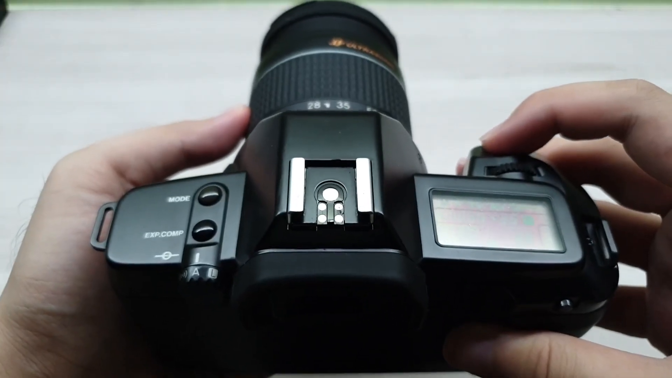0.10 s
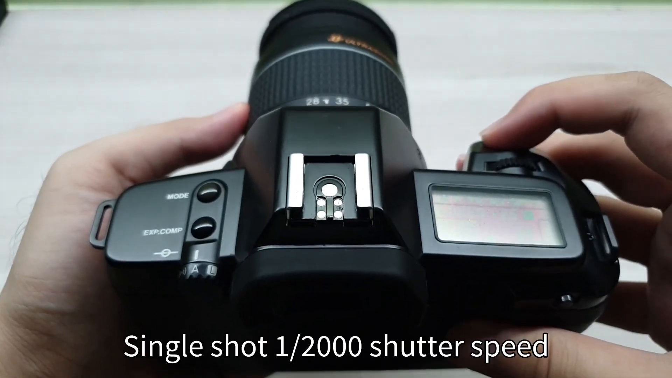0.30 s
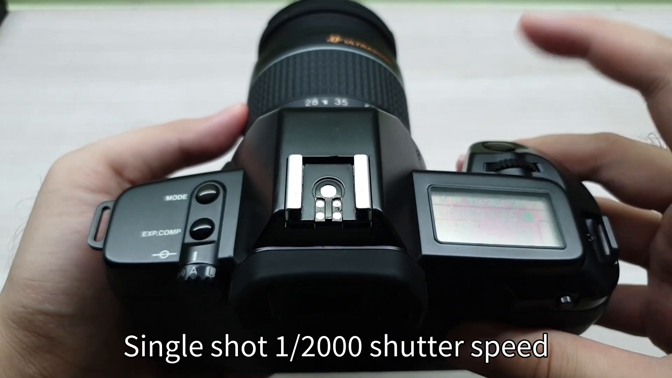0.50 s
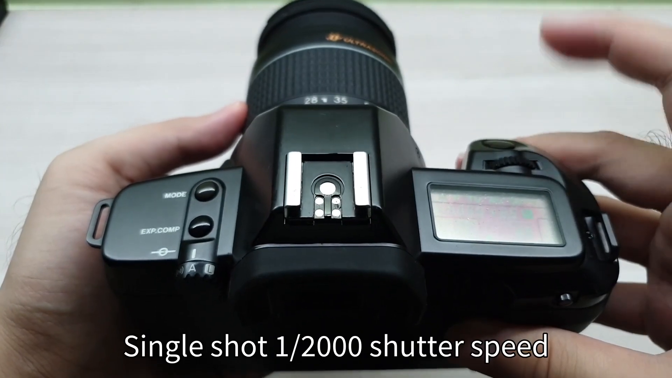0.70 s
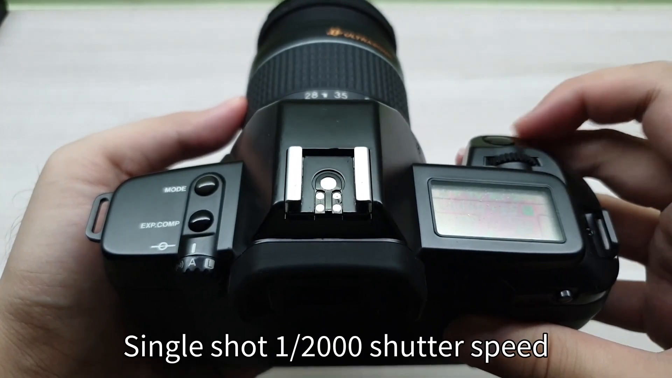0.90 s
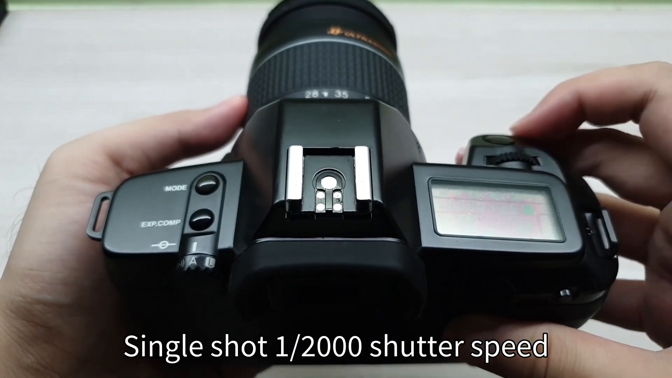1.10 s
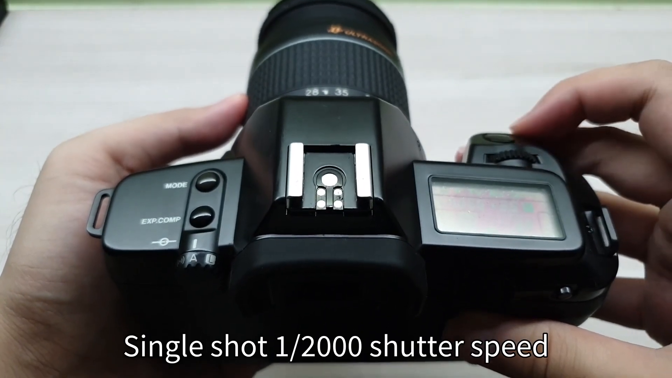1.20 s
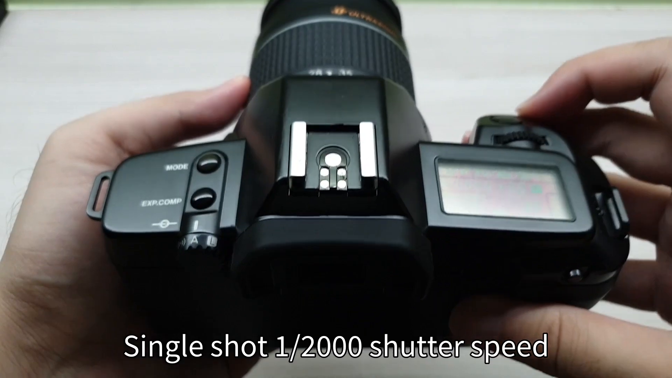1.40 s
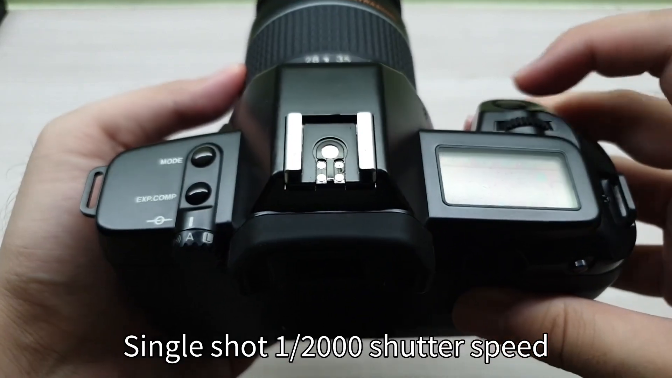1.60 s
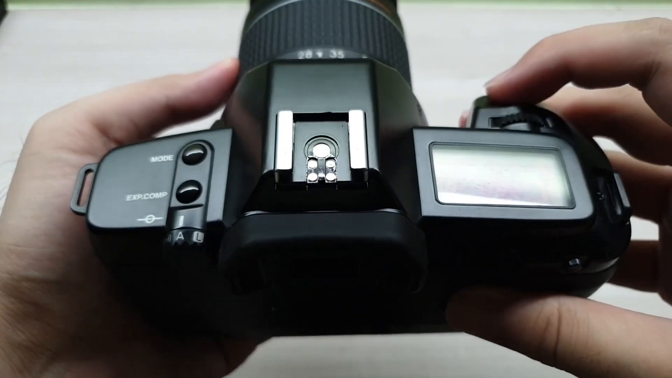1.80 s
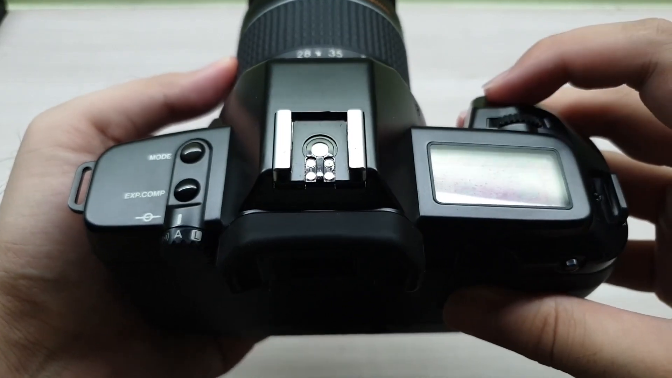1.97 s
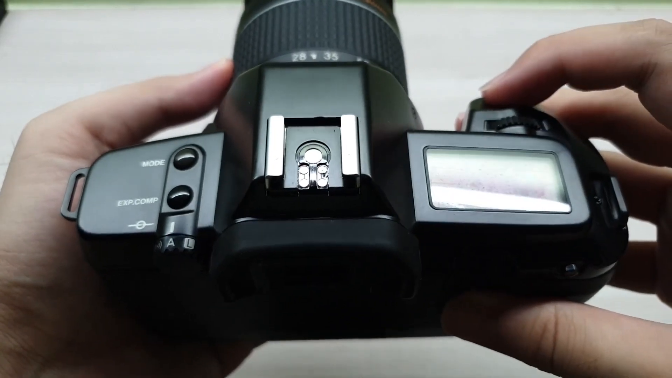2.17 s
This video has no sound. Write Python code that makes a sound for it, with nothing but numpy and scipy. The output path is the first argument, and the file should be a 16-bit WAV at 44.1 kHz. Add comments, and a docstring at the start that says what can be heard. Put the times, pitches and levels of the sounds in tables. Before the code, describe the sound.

A film camera shutter fires once, close to the microphone in a small quiet room. After faint hiss, a latch clicks at 0.24 seconds, then mirror and shutter clack hard between 0.31 and 0.41. A geared motor whirrs and whines over them, stopping near 0.6. A short room tail fades. A barely audible touch comes at 1.0, a soft button tick with skin rustle at 1.6, fainter ones near 1.87.

```python
"""A small quiet room, a film camera close to the microphone: it fires once, and later a finger ticks on its button.
A latch clicks, mirror and shutter clack: short bursts of tiny impacts ring the modes of the plastic and metal body.
The motor spins up, whirrs and stops: shaft harmonics whine while gear noise rattles that same body.
The softer ticks ring the button's own modes; skin rustle is band-limited grit.
A diffuse tail of noise gives the room; room tone, hiss and two thin tones lie underneath."""
import sys
import numpy as np
from scipy import signal
from scipy.fft import rfft, irfft
from scipy.io import wavfile
from scipy.ndimage import uniform_filter1d

SR = 44100
rng = np.random.default_rng(int(sys.argv[2]) if len(sys.argv) > 2 else 0)


def to_wav(s):
    """Save 16-bit WAV."""
    ch = np.atleast_2d(s).T  # columns
    pcm = np.round(np.clip(ch, -1, 1) * 32767)  # PCM
    wavfile.write(sys.argv[1], SR, pcm.astype(np.int16))


N = 97020  # samples, 2.2 s


def undb(db):
    """Amplitude factor of a level in dB."""
    return 10 ** (np.asarray(db) / 20)


def unit(x):
    """Scale to an RMS of 1."""
    return x / np.sqrt(np.mean(x ** 2))


def follow(t, table, **ends):
    """Straight lines through the (time, value) rows of a table."""
    return np.interp(t, *np.array(table).T, **ends)


def over_pitch(hz, table, column):
    """Read a column of a table along a logarithmic frequency axis."""
    rows = np.array(table)
    return np.interp(np.log(hz), np.log(rows[:, 0]), rows[:, column])


def smooth_noise(width):
    """Slow random drift of RMS 1: noise averaged twice over width samples."""
    once = uniform_filter1d(rng.standard_normal(N), size=width)
    return unit(uniform_filter1d(once, size=width))


def grit(scatter_db, size):
    """Dense tiny impacts of very uneven strength."""
    impacts = rng.standard_normal(size)
    strength = undb(scatter_db * rng.exponential(size=size))
    return unit(impacts * strength)


# spectrum of the room tone and microphone hiss: (frequency [Hz], relative level [dB per Hz])
AIR_SPECTRUM = [(20, 1), (98, -5), (142, -12.5), (300, -17), (660, -21.5), (1190, -25), (2300, -30.5),
                (3600, -39.5), (7000, -42), (9000, -45), (16000, -49)]
# two faint electronic tones: (frequency [Hz], RMS level before the fade [dB])
THIN_TONES = [(8000, -86), (7000, -93)]
# the thin tones come and go: (time [s], gain [dB])
TONE_FADE = [(0, -3), (.85, 0), (1.4, 0), (1.5, -9), (1.95, -9), (2.1, -3)]
AIR_DB, RUMBLE_SWAY_DB = -54.5, 3  # RMS level of the noise, RMS sway of its rumble


def air(t):
    """Room tone and microphone hiss are shaped noise; the rumble sways, two thin tones sit on top."""
    f = np.fft.rfftfreq(N, 1 / SR) + 1  # keeps the logarithm finite at zero
    spectrum = undb(over_pitch(f, AIR_SPECTRUM, 1)) * rfft(rng.standard_normal(N))
    low_share = 1 / (1 + (f / 150) ** 2)
    rumble = undb(RUMBLE_SWAY_DB * smooth_noise(4000)) * irfft(spectrum * low_share, N)
    hiss = irfft(spectrum * (1 - low_share), N)
    fade_db = follow(t, TONE_FADE)
    tones = sum(np.sqrt(2) * undb(db + fade_db) * np.sin(2 * np.pi * hz * t) for hz, db in THIN_TONES)
    return undb(AIR_DB) * unit(rumble + hiss) + tones


# late tail of the small room: (frequency [Hz], relative level [dB], t60 [s])
ROOM_TAIL = [(500, 2.5, .55), (2500, -1.5, 0.74), (4500, -1, 0.67), (7100, 6, .6), (10100, -4.5, .4),
             (13900, -4.5, .25)]
ROOM_DB = -16.5  # energy of the whole response against the direct sound
EARLY_DB, EARLY_T60_S = 11, .15  # reflections from the table and the hands, same scale as the late tail


def room(x):
    """Diffuse reflections: half-octave bands of noise, each with an early and a late decay."""
    size = SR // 2
    t, f = np.arange(size) / SR, np.fft.rfftfreq(size, 1 / SR) + 1
    tail = 0
    for hz in 125 * 2 ** np.arange(0, 7.1, .5):
        window = np.exp(-8 * np.log2(f / hz) ** 2)
        band = irfft(rfft(rng.standard_normal(size)) * window, size)
        late = undb(over_pitch(hz, ROOM_TAIL, 1) - 60 * t / over_pitch(hz, ROOM_TAIL, 2))
        early = undb(EARLY_DB - 60 * t / EARLY_T60_S)
        tail = tail + band * (late + early)
    return undb(ROOM_DB) * signal.fftconvolve(x, tail / np.linalg.norm(tail))[:N]


# skin sliding over the plastic: (time [s], RMS level [dB])
SKIN_SLIDES = [(.96, -90), (.99, -71), (1.02, -88), (1.5, -90), (1.6, -76), (1.63, -71), (1.67, -75),
               (1.72, -80), (1.87, -80), (1.95, -89.5)]
# band of the rustle: low and high edge [Hz]
SKIN_BAND = [3000, 11000]
SKIN_SCATTER_DB = 1.5


def rustle(t):
    """A finger shifts on the grip: skin friction as band-limited grit."""
    skin = signal.lfilter(*signal.butter(1, SKIN_BAND, "band", fs=SR), grit(SKIN_SCATTER_DB, size=N))
    return undb(follow(t, SKIN_SLIDES, left=-200, right=-200)) * unit(skin)


def ring(x, hz, t60):
    """One mode that dies away 60 dB in t60 seconds; about the same energy for any t60."""
    r = np.exp(-np.log(1000) / (t60 * SR))  # pole radius
    resonator = [1, -2 * r * np.cos(2 * np.pi * hz / SR), r * r]
    return signal.lfilter([1, 0, -1], resonator, x) * np.sqrt(1 - r * r) / 2


# borders between bass, low, middle and high modes: [Hz]
GROUP_EDGES = [700, 2000, 5200]
CRACK_DB, CRACK_HZ = -12.5, 896.3  # unresonant part of the force, above this cutoff


def body(force, modes):
    """A part rings with the same modes whatever knocks it; one force for each group of modes."""
    out = undb(CRACK_DB) * signal.lfilter(*signal.butter(2, CRACK_HZ, "high", fs=SR), force[-1])
    for hz, db, t60 in modes:
        group = np.searchsorted(GROUP_EDGES, hz)
        out = out + undb(db) * ring(force[group], hz, t60)
    return out


# the whole camera thumping in the hands: (frequency [Hz], level [dB], t60 [s])
CAMERA_IN_HANDS = [(40, -1.5, .08), (105, -1.5, 0.037), (200, -7, 0.039), (310, -1, 0.02)]
RISE_SHARE = .35  # rise time constant as a share of the chatter's decay constant
CHATTER_SCATTER_DB, PUSH_MS = 2.5, .4  # unevenness of the chatter, peak time of the push


def blows(rows, modes):
    """Each blow is a short chatter of parts, plus a soft push that thumps the whole camera."""
    ms = np.arange(1500) / SR * 1000
    force, push = np.zeros((4, N)), np.zeros(N)
    push_shape = ms / PUSH_MS * np.exp(-ms / PUSH_MS)
    for s, db, chatter_ms, bass_db, low_db, high_db, thump_db in rows:
        rise = (1 - np.exp(-ms / (RISE_SHARE * chatter_ms))) ** 2
        shape = rise * np.exp(-ms / chatter_ms)
        at = slice(int(s * SR), int(s * SR) + len(ms))
        for group, part_db in zip(force, (bass_db, low_db, 0, high_db)):
            hit = shape * grit(CHATTER_SCATTER_DB, size=len(ms))
            hit *= np.linalg.norm(shape) / np.linalg.norm(hit)  # same energy for every draw
            group[at] += undb(db + part_db) * hit
        push[at] += undb(db + thump_db) * push_shape
    thump = sum(undb(db) * ring(push, hz, t60) for hz, db, t60 in CAMERA_IN_HANDS)
    return body(force, modes) + thump


# finger on the button: (time [s], level [dB], chatter decay constant [ms],
#   bass, low and high modes and thump against the middle modes [dB each])
FINGER_TICKS = [(0.9923, -69, 0.86, -20, -8, -9, 0), (.9976, -60.5, 2.3, -5.5, 24, 3, 7.5),
                (1.0020, -63.5, 1.57, -10, 18, -12, -26), (1.6224, -36.5, 2.1, -16, -8.5, -1.5, -19.5),
                (1.6488, -52, 0.49, -10, 8, 2.5, -10), (1.6570, -52.5, 1.5, -10, 0, 0, -3),
                (1.5830, -66, 1.5, -20, -7.5, 3.5, -6), (1.861, -67.5, 2.5, -19.5, -7.5, 3, -10),
                (1.8800, -67, 1.5, -20, -6, 6, -12)]
# modes of the release button and dial under the finger: (frequency [Hz], level [dB], t60 [s])
BUTTON_MODES = [(570, 7, .02), (980, -1, 0.023), (1467, -2.5, .02), (1830, -2, 0.028), (2095, 6.5, 0.0097),
                (3350, 0, 0.045), (5400, -28, 0.026), (6390, -5.5, 0.0044), (7950, 1.5, 0.0034),
                (9500, -6, 0.002), (13500, -8, 0.0022)]


def button_ticks():
    """A finger ticks softly; the small blows ring the button and dial."""
    return blows(FINGER_TICKS, BUTTON_MODES)


# motor run: (time [s], gear rattle RMS level [dB], its high modes' drive [dB], whine RMS level [dB])
MOTOR_RUN = [(0.2595, -39, -6, -64), (.265, -27, -1, -51.5), (0.286, -28.5, -1.5, -43.5),
             (0.308, -25, 2.5, -44.5), (.35, -29.5, 0.5, -41.5), (.38, -30.5, 2.5, -41.5),
             (0.412, -24.5, 1, -37.5), (0.437, -29, 1.5, -27), (.47, -28.5, 2.5, -29),
             (0.514, -30.5, 2.5, -29), (0.551, -31, 4, -29), (0.56, -26, -3, -35.5),
             (0.569, -39.5, -0.5, -37), (0.587, -54, 3, -47), (0.601, -85, -3, -67)]
# motor speed: (time [s], shaft speed [turns per s])
SHAFT_SPEED = [(.2615, 120), (.284, 142), (.3, 156), (.325, 165), (.35, 171), (.39, 177), (.42, 179),
               (.44, 176.5), (.515, 176), (.54, 168), (.56, 169), (.575, 164), (.6, 140)]
# harmonics of the whine: (multiple of the shaft speed, relative level [dB])
WHINE_HARMONICS = [(1, -20.5), (2, -24), (3, -6.5), (4, -26.5), (5, -18.5), (6, -15), (7, -20.5),
                   (8, -26.5), (9, -14), (10, -10), (11, -12), (12, -19.5), (13, -6.5), (14, -3.5), (15, 0),
                   (16, -15.5), (17, -13), (18, -13.5), (19, -14)]
# added drive of the rattle's bass and low modes: (time [s], gain [dB])
RATTLE_LOW_GAIN = [(.26, 0.5), (.3, 1.5), (.45, -0.5), (.48, -7.5), (.53, -9.5), (.56, -0.5)]
# modes of the camera body, rung by gears and clacks: (frequency [Hz], level [dB], t60 [s])
BODY_MODES = [(415, -3.5, .05), (524, -1, 0.024), (950, -12.5, .025), (1120, -8, .025), (1350, -7, 0.0097),
              (1640, -5, 0.011), (1910, -8.5, .015), (2377, 2, .012), (2730, 0.5, 0.0089), (3150, 0, .012),
              (3600, -8.5, 0.036), (4350, -16.5, .008), (6100, -10, .006), (6600, 0.5, .01),
              (7404, -1.5, .005), (8400, -0.5, .003), (9580, -1.5, .004), (11800, -6.5, .002),
              (14100, -14.5, .0015)]
RATTLE_BASS_DB, RATTLE_LOW_DB = -6, 1  # drive of these modes before the added gain; middle modes 0
RATTLE_SCATTER_DB, RATTLE_TOP_HZ = .5, 11000
CLATTER_DB = .5  # RMS unevenness of the gears over a few ms
TURN_DEPTH, WOBBLE = .3, .001  # swell once a turn, RMS speed wobble; both as fractions


def motor(t):
    """Shaft harmonics whine; gear teeth rattle the body, stronger once a turn."""
    s, rattle_db, high_db, whine_db = np.array(MOTOR_RUN).T
    wobble = unit(uniform_filter1d(rng.standard_normal(N), size=300))
    speed = follow(t, SHAFT_SPEED) * (1 + WOBBLE * wobble)
    turn = 2 * np.pi * np.cumsum(speed) / SR
    whine = unit(sum(undb(db) * np.sin(k * turn + rng.uniform(0, 2 * np.pi)) for k, db in WHINE_HARMONICS))

    gate = (1 + TURN_DEPTH * np.sin(turn)) * undb(CLATTER_DB * smooth_noise(90))
    lows_db = follow(t, RATTLE_LOW_GAIN)
    drive_db = RATTLE_BASS_DB + lows_db, RATTLE_LOW_DB + lows_db, 0, np.interp(t, s, high_db)
    force = [undb(db) * gate * grit(RATTLE_SCATTER_DB, size=N) for db in drive_db]
    rattle = signal.lfilter(*signal.butter(1, RATTLE_TOP_HZ, fs=SR), body(force, BODY_MODES))

    whine_level = undb(np.interp(t, s, whine_db, left=-200, right=-200))
    rattle_level = undb(np.interp(t, s, rattle_db, left=-200, right=-200))
    return whine_level * whine + rattle_level * unit(rattle)


# latch, mirror, shutter and levers: (time [s], level [dB], chatter decay constant [ms],
#   bass, low and high modes and thump against the middle modes [dB each])
CAMERA_CLACKS = [(.2440, -12, 1.8, -27.5, -6, -3.5, -41.5), (.2632, -28.5, 1.5, -12.5, -8.5, -1, -30),
                 (.2887, -27, 1.2, -11.5, -10.5, 3, -10), (.2945, -25, 1.5, -14, -5.5, -7, -24),
                 (.3022, -20, 2.3, -13, -8, 0.5, -18.5), (.3072, -25.5, 1.4, -11, -7.5, 9.5, -21),
                 (.3108, -9, 3.04, -17.5, -10, -0.5, -31.5), (.3182, -14.5, 1.65, -9.5, -2, 1, -29),
                 (.3300, -25, 0.95, -14.5, -5, -2.5, -21.5), (.3400, -20, 2.1, -7.5, -4, 3.5, -19),
                 (.3495, -1.5, 2, -8.5, -6, -12, -34.5), (.3805, -22.5, 1.7, -7, -12, 8.5, -18.5),
                 (.3897, -27.5, 1.1, -10, -8, 7, -21.5), (.4098, -3, 0.87, 1, 2, 0.5, -17),
                 (.4232, -23, 1.1, -7.5, -4, -0.5, -19.5), (.4365, -15.5, 2.7, -3.5, -7, 1.5, -10),
                 (.4410, -24.5, 1, -9.5, -11.5, 7.5, -24), (.4575, -25, 1.3, 4.5, -6, 6.5, -24.5)]


def shutter_clacks():
    """Latch, mirror, shutter and levers strike in quick succession and ring the body."""
    return blows(CAMERA_CLACKS, BODY_MODES)


def scene():
    """The close camera, its reflections in the room and the quiet air, alike on both channels."""
    t = np.arange(N) / SR
    camera = shutter_clacks() + button_ticks() + motor(t) + rustle(t)
    return np.tile(camera + room(camera) + air(t), (2, 1))


BOTTOM_HZ, TOP_HZ = 20.4, 15900  # range of the microphone signal


def record(dry):
    """One microphone on both channels: bass cut, peaks clipped at full scale, then a steep treble cut."""
    dry = np.clip(signal.lfilter(*signal.butter(2, BOTTOM_HZ, "high", fs=SR), dry), -1, 1)
    return signal.sosfilt(signal.ellip(10, .2, 80, TOP_HZ, fs=SR, output="sos"), dry)


dry = scene()
out = record(dry)
to_wav(out)
```